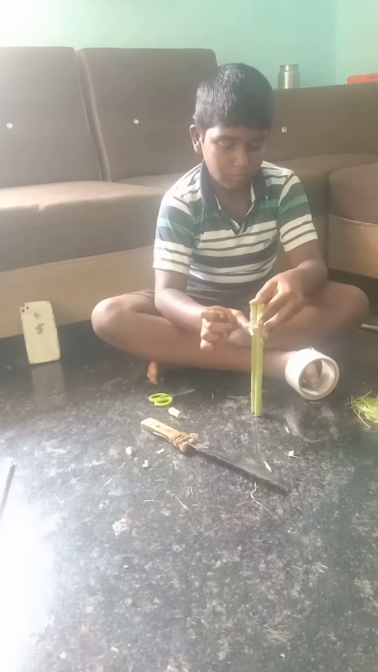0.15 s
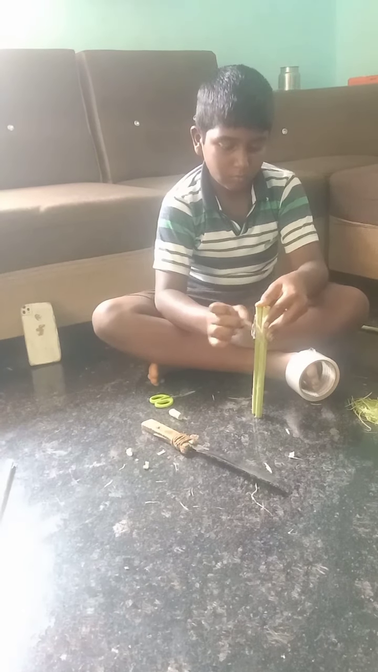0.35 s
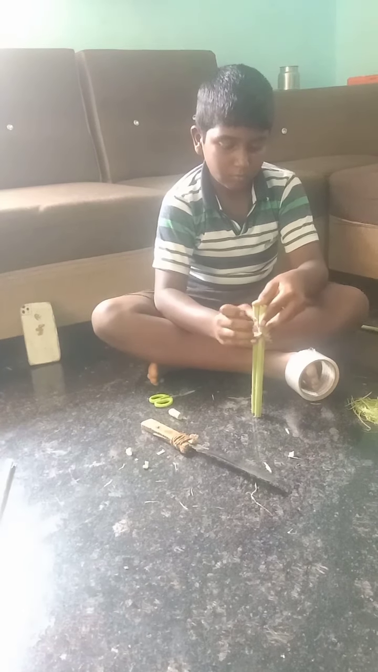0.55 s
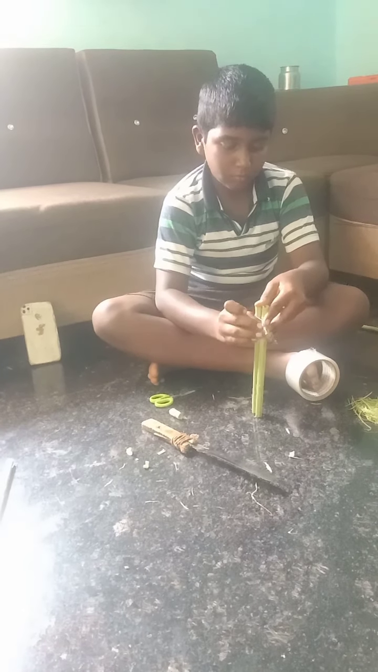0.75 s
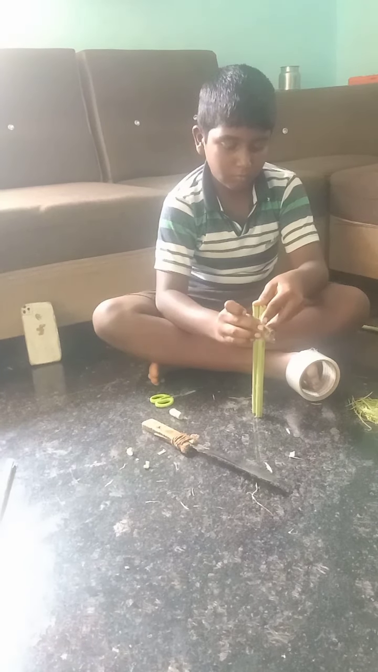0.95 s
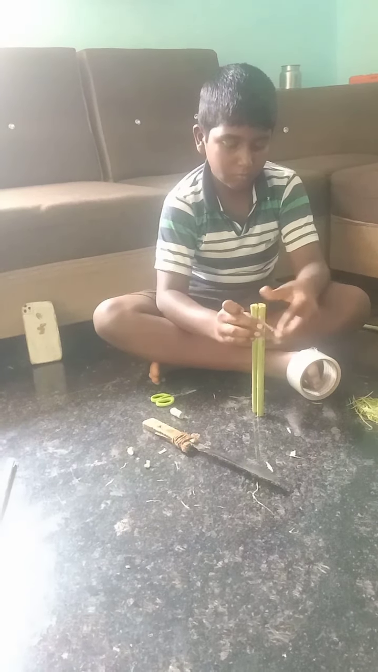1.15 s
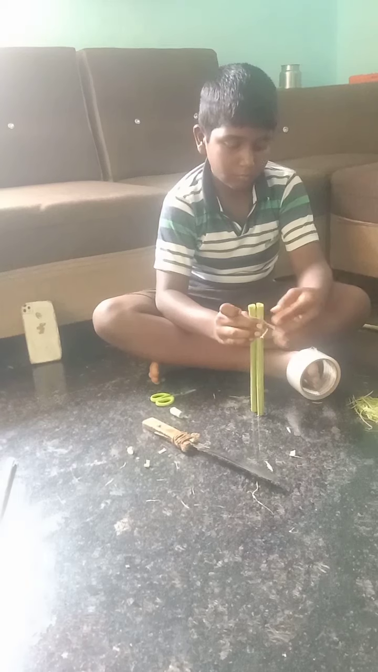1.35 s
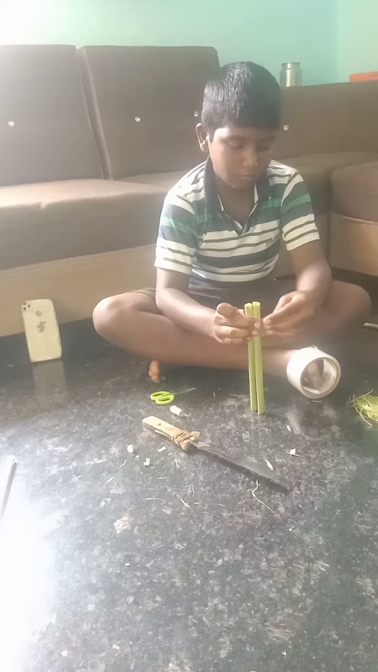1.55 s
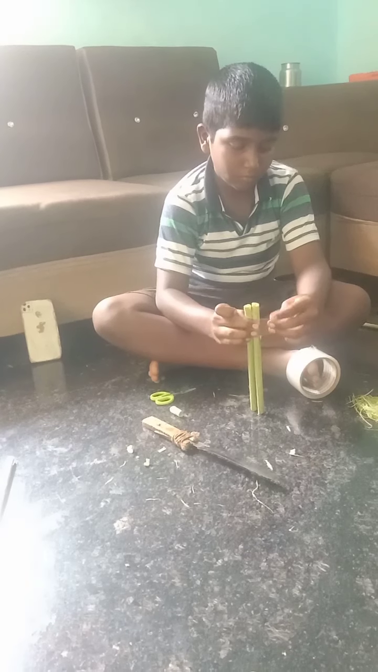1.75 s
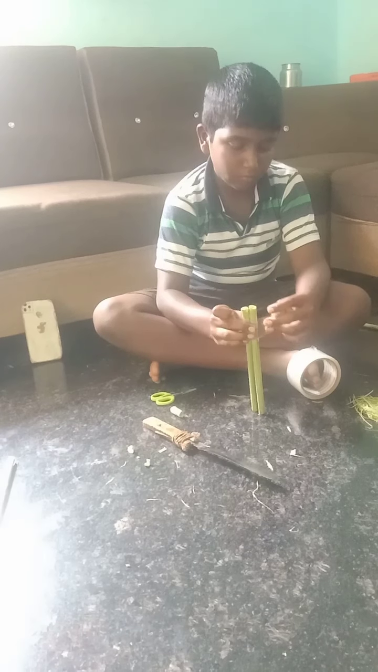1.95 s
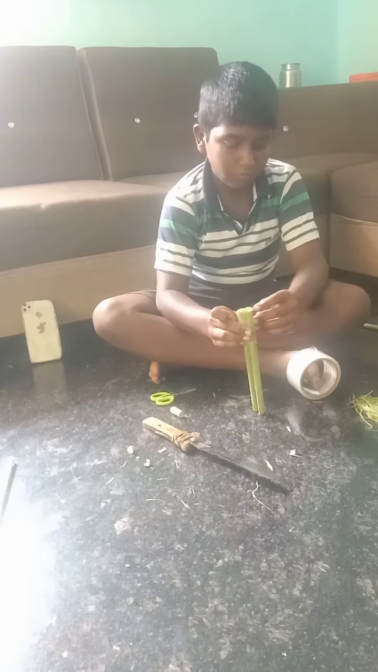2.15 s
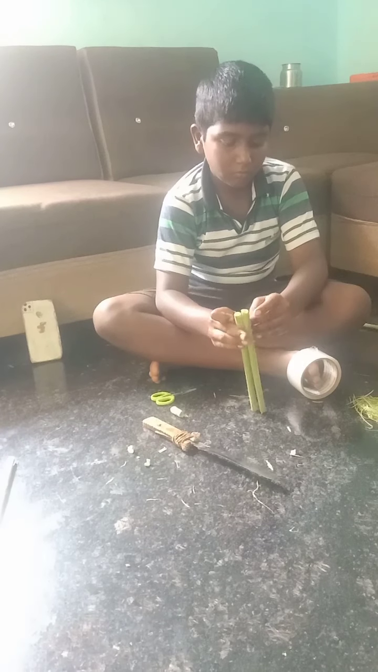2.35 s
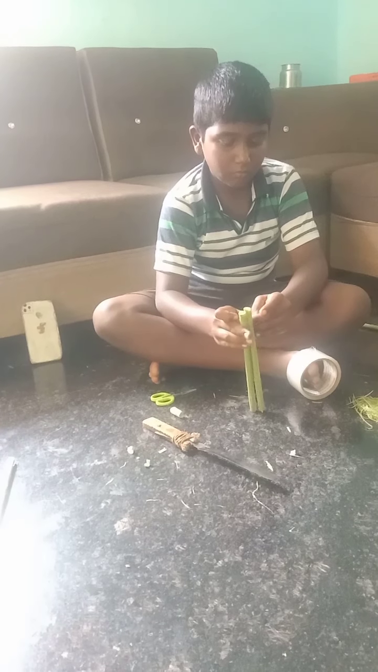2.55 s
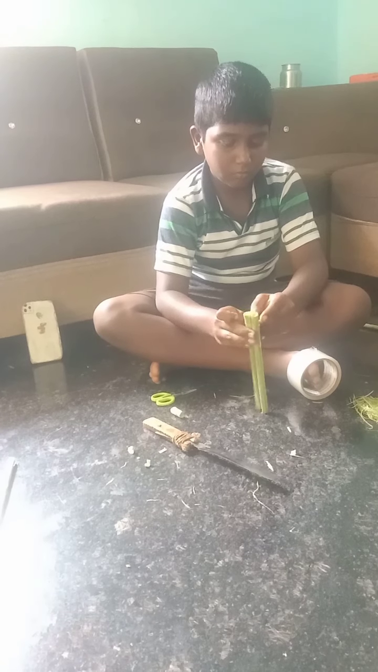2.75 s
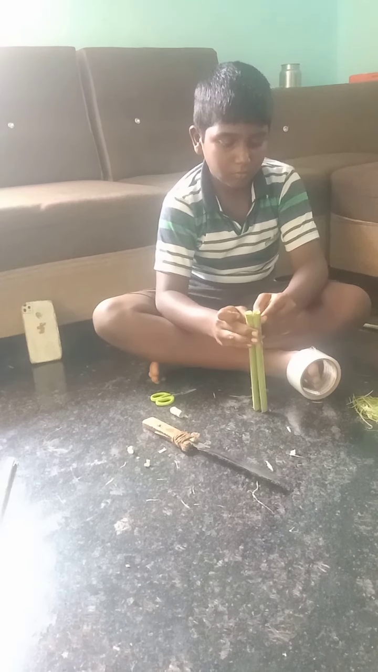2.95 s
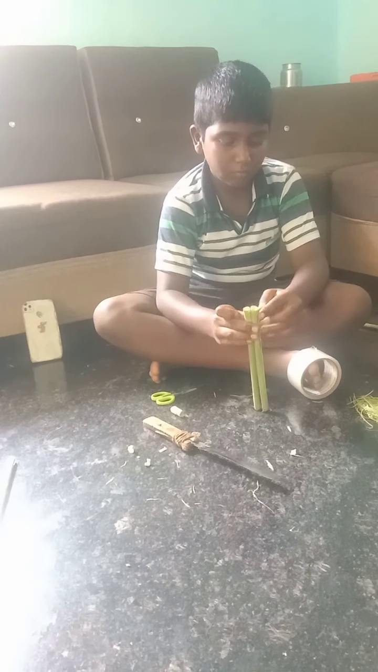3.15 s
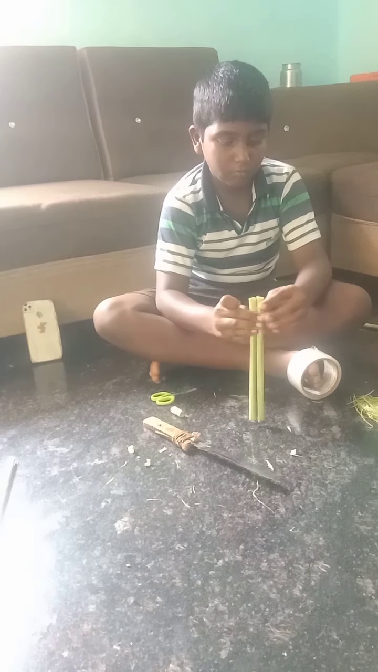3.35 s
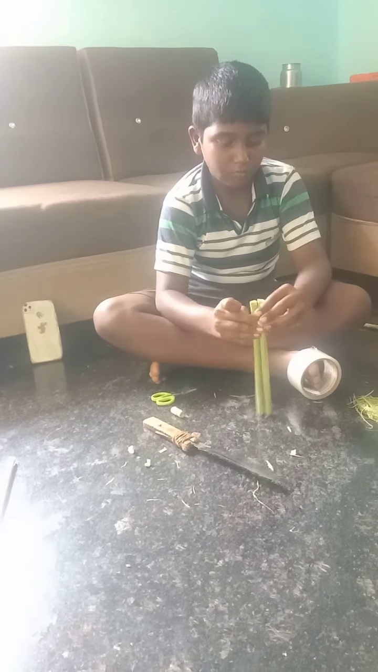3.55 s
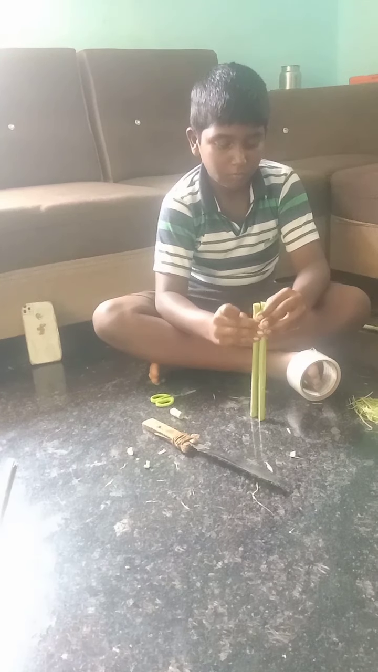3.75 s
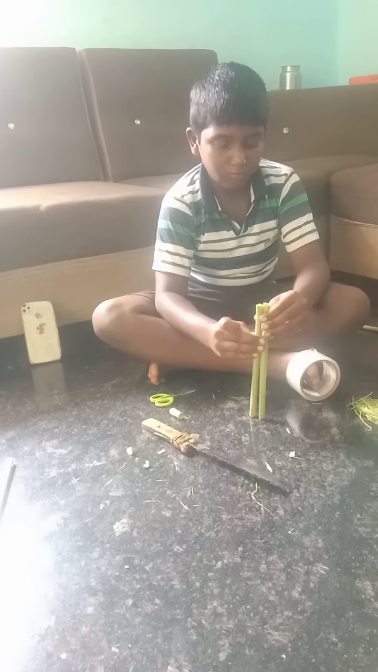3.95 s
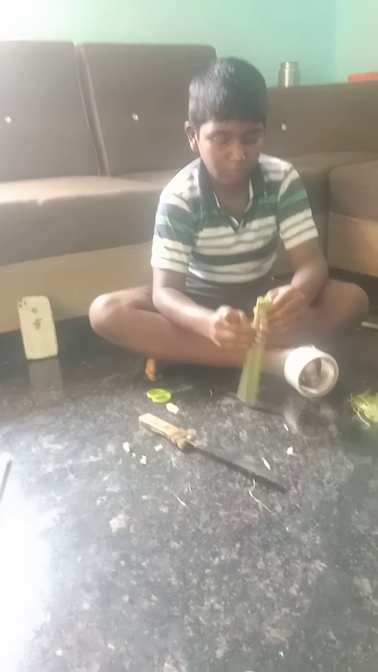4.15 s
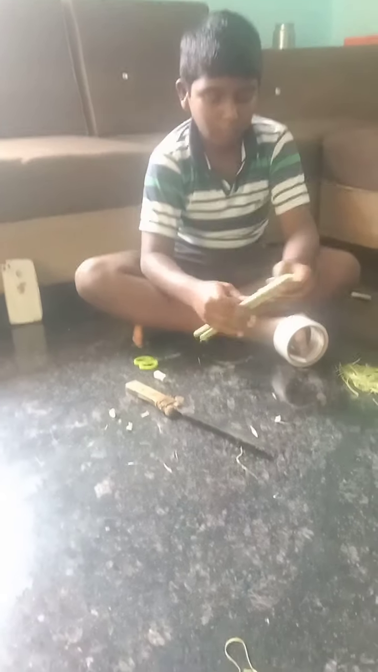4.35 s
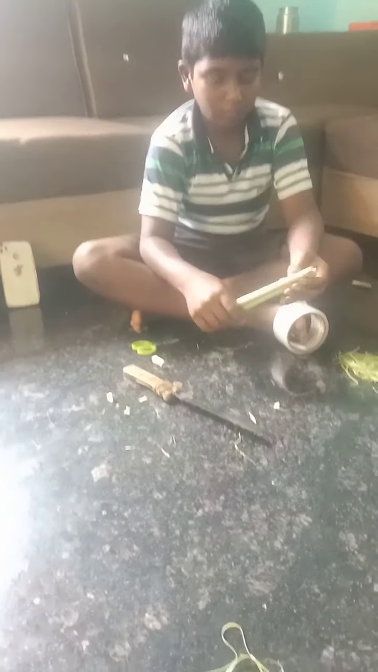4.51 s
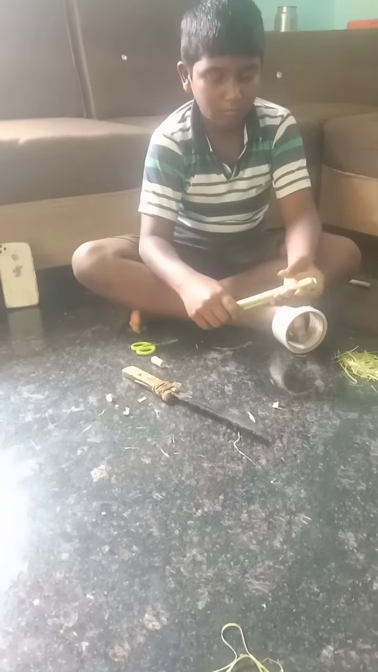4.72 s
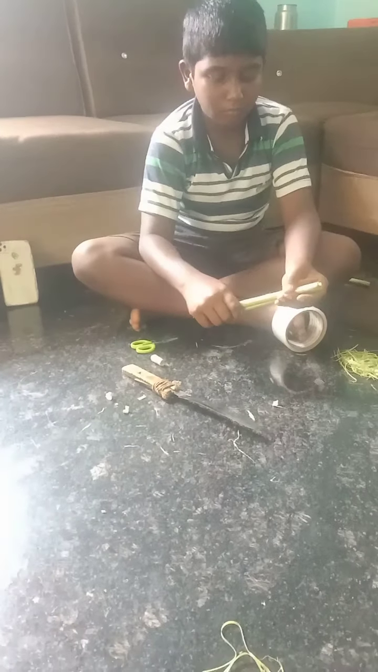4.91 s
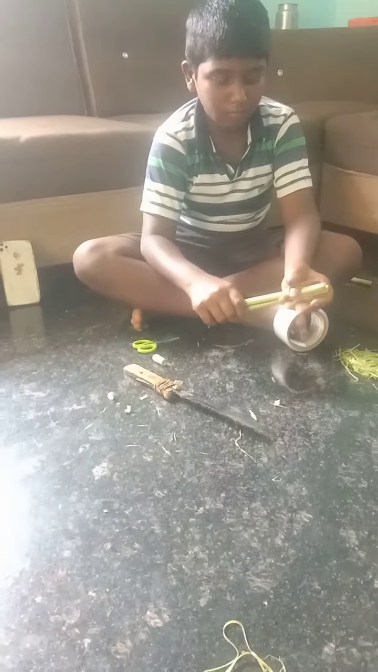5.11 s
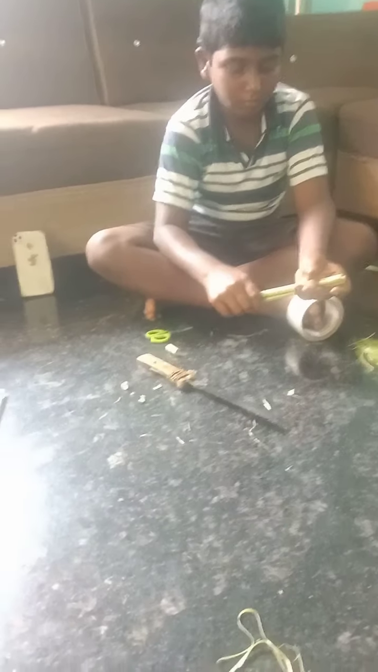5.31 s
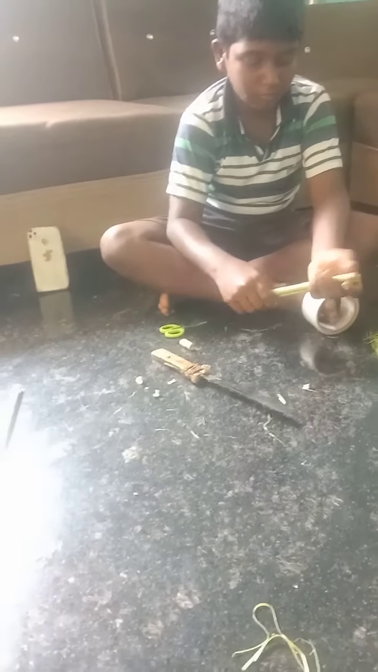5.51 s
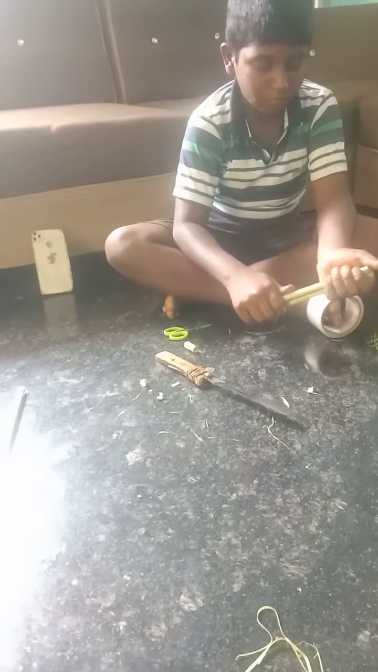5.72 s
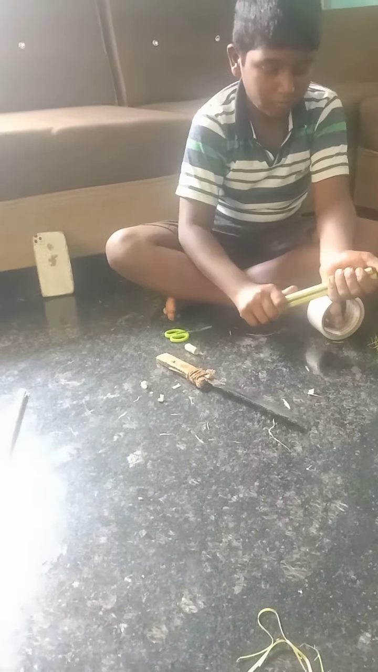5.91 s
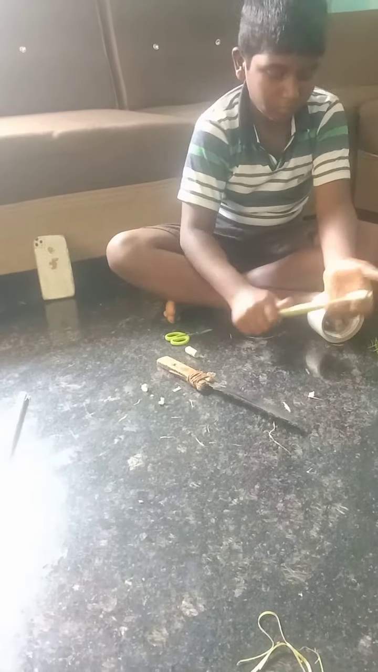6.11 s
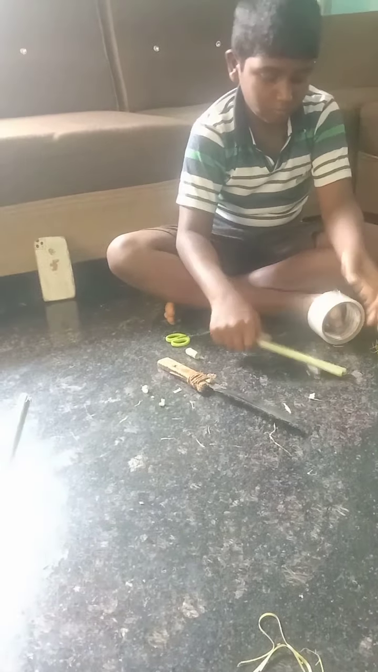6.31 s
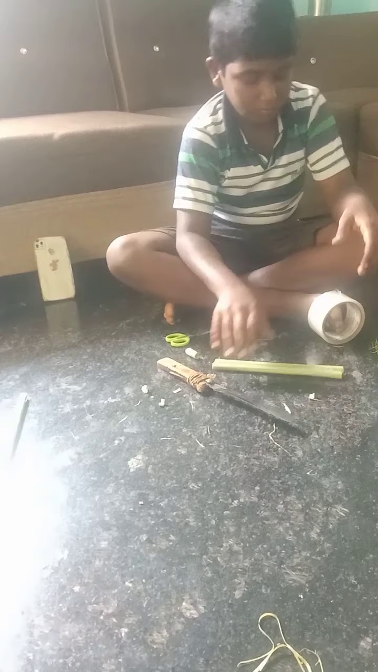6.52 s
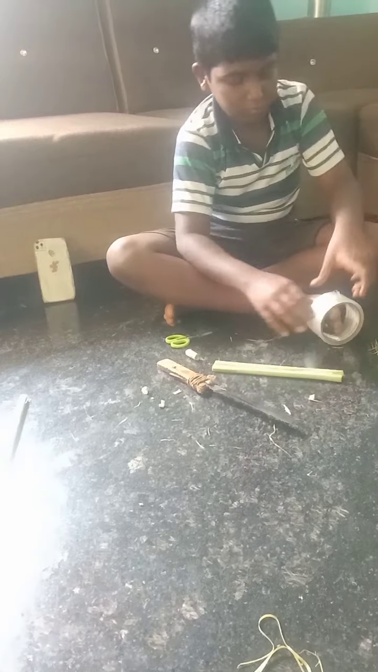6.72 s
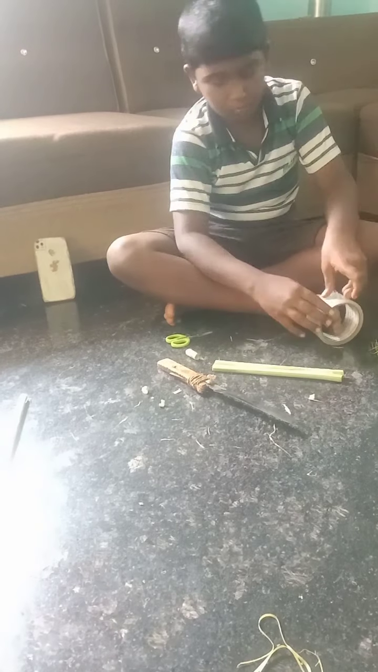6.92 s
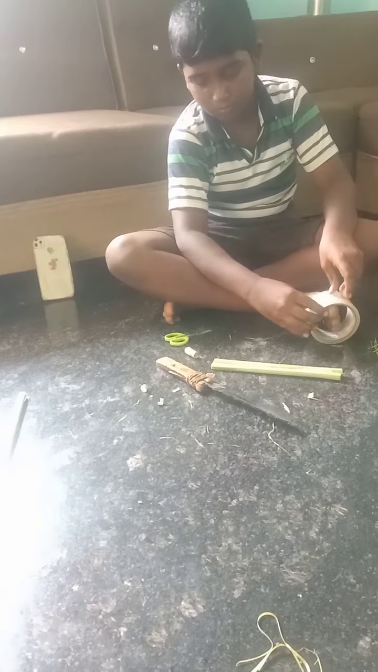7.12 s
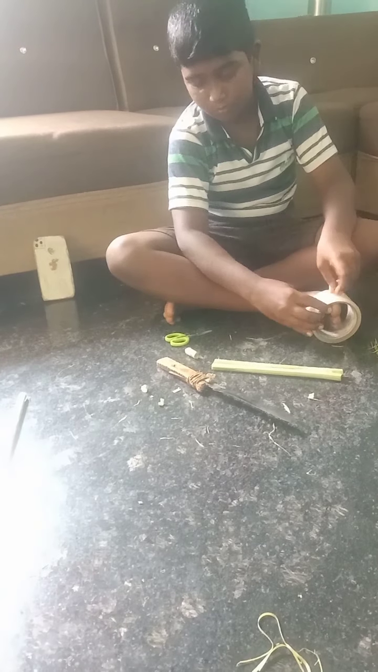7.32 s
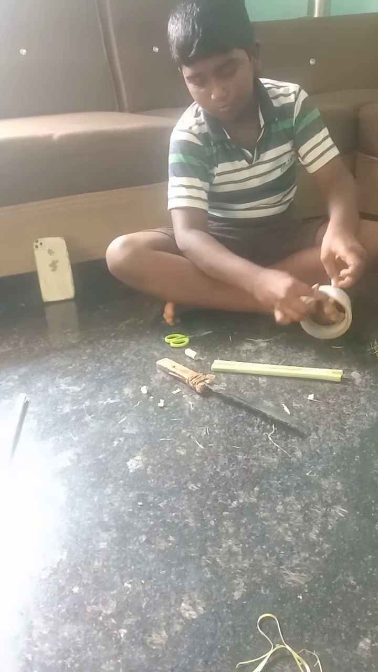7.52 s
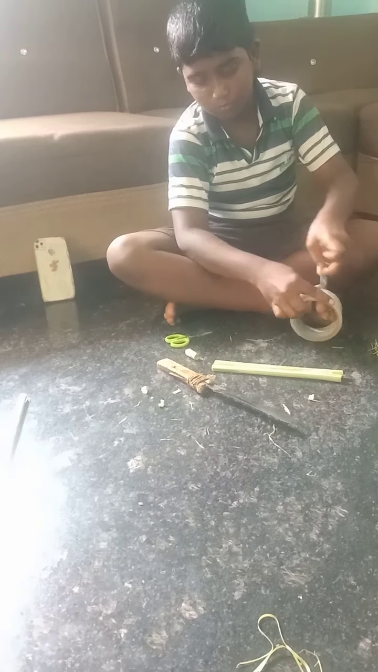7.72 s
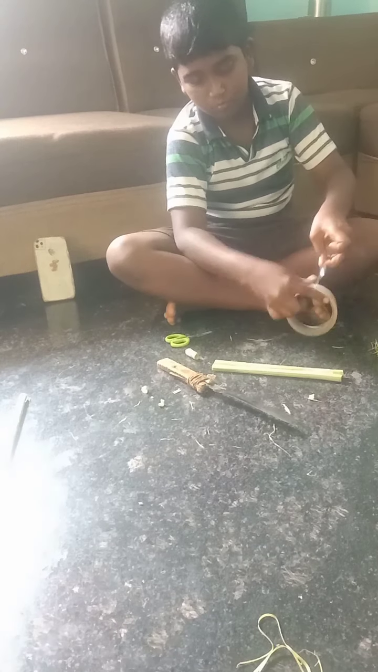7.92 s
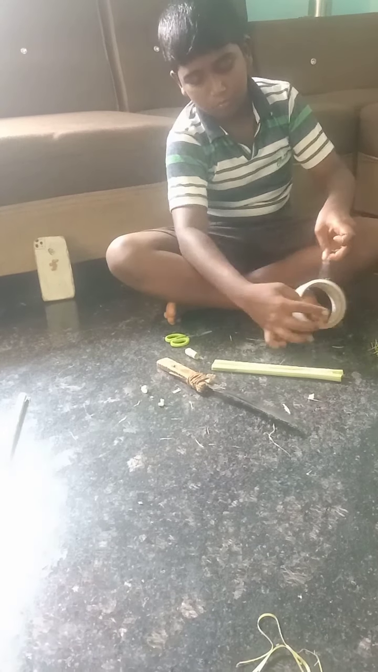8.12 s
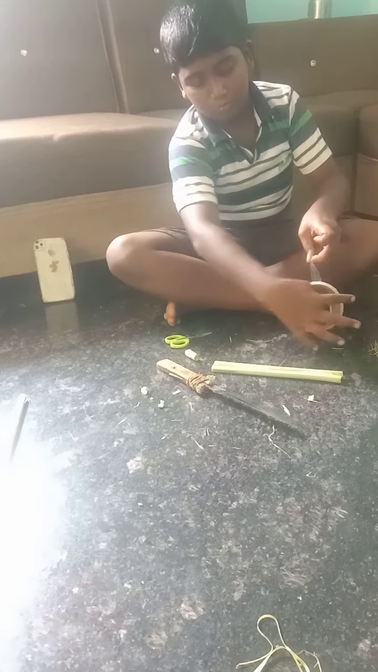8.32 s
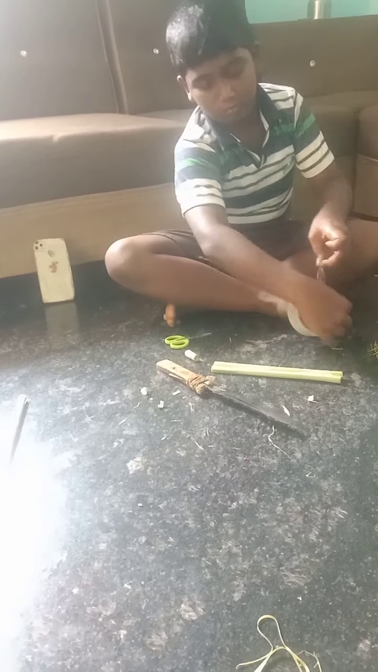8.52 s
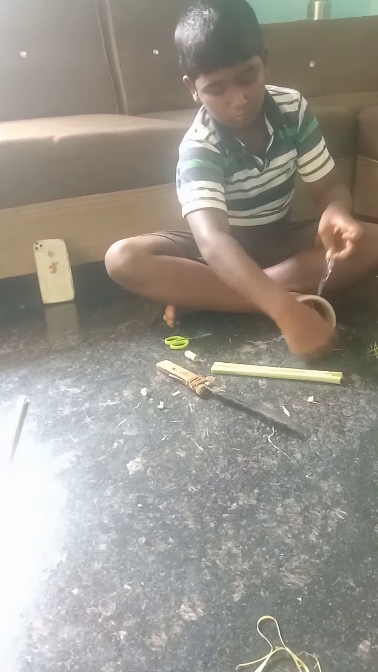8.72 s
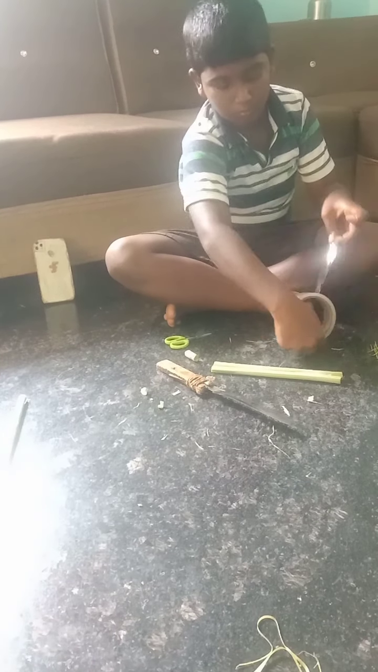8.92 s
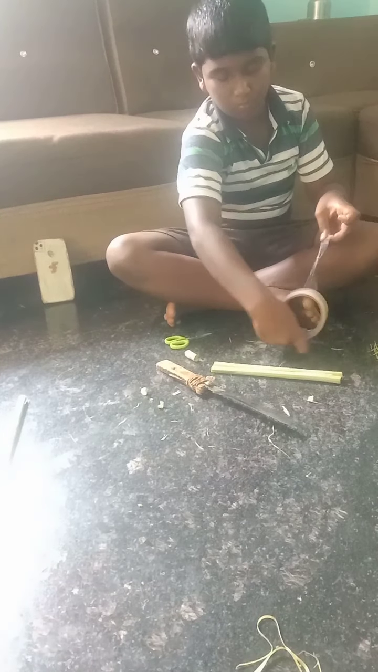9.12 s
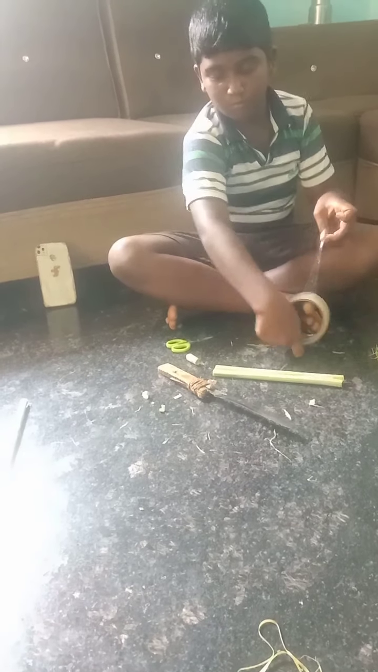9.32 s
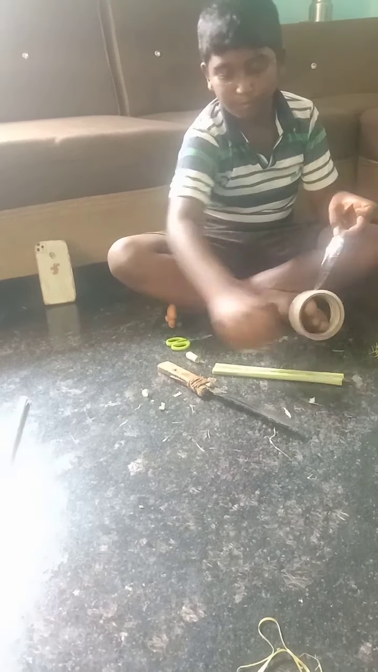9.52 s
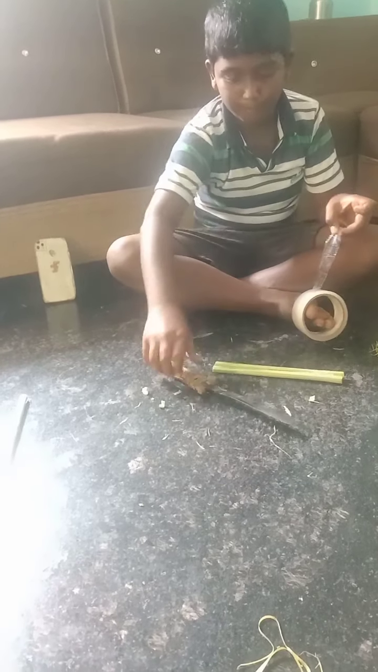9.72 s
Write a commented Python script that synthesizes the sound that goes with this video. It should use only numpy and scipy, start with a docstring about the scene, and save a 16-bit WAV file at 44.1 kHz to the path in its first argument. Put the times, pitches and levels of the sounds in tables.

```python
"""Outdoor wash runs throughout; over it a low rumble opens the scene, fades, and later returns fainter.
Someone on a stone floor presses tape round a bundle of stalks, in filtered noise snaps and fine ticks.
From 2.7 s a small bird squeals further off, built from unsteady harmonics and hiss; the bundle is set down.
From 7.35 s packing tape is ripped off its roll in short jerks, each a burst of tiny glue snaps.
The freed strip twangs lower as it lengthens, in two sagging sine modes, and the bare room rings."""
import sys
import numpy as np
from scipy import signal
from scipy.fft import rfft, irfft, next_fast_len
from scipy.io import wavfile
from scipy.ndimage import uniform_filter1d

SR = 44100
rng = np.random.default_rng(int(sys.argv[2]) if len(sys.argv) > 2 else 0)


def output_pcm(signal):
    """Save a mono or channel-first signal as 16-bit PCM at the path in sys.argv[1].

    Samples are clipped to [-1, 1] before scaling.
    """
    pcm = np.clip(np.atleast_2d(signal).T, -1, 1) * 32767
    wavfile.write(sys.argv[1], SR, np.round(pcm).astype(np.int16))


N = 430416
TIME = np.arange(N) / SR


def amp(db):
    """Turns dB into a linear gain."""
    return 10 ** (np.asarray(db) / 20)


def unit(x):
    """Scales a signal to an rms of 1."""
    return x / np.sqrt(np.mean(x ** 2) + 1e-20)


def read(points, hz):
    """Reads a spectrum table, joined on a log-frequency axis."""
    f, value = np.transpose(points)
    return np.interp(np.log(hz + 1), np.log(f + 1), value)


def add(mix, s, sound):
    """Lays a sound into the mix at s seconds, cut at the end."""
    part = mix[max(round(s * SR), 0):][:len(sound)]
    part += sound[:len(part)]


def colour(x, points, tilt_db=0):
    """Filters x by a spectrum and a tilt per octave above 1 kHz, keeping the power of white noise."""
    hz = np.fft.rfftfreq(len(x), 1 / SR)
    tilt = tilt_db * np.log2(np.maximum(hz, 1000) / 1000)
    gain = unit(amp(read(points, hz) + tilt))
    return irfft(rfft(x) * gain, len(x))


def wander(size, rate_hz):
    """Smooth random motion, cut from a stretch of rms 1, fading out of the spectrum around the given rate."""
    hz = np.fft.rfftfreq(next_fast_len(size + SR // 4), 1 / SR)
    noise = rng.standard_normal(2 * len(hz) - 2)
    return unit(irfft(rfft(noise) * np.exp(-(hz / rate_hz) ** 2)))[:size]


def fade(size, edge_s):
    """A gate with soft ends."""
    ramp = np.arange(size) / SR / edge_s
    return np.clip(np.minimum(ramp, ramp[::-1]), 0, 1)


def envelope(t, rise_s, hold_s, release_s):
    """Rises from t = 0, holds until hold_s, then dies away exponentially."""
    return np.clip(t / rise_s, 0, 1) * np.exp(-np.clip((t - hold_s) / release_s, 0, 20))


# Decay of the room's tail. Each row: frequency in Hz, time to fall 60 dB in seconds.
TAIL_T60 = [(100, 0.75), (500, 0.34), (1300, 0.57), (3500, 0.59), (7000, 0.43), (10000, 0.45), (15000, 0.3)]
# Echoes from nearby walls. Each row: delay in seconds, linear gain before the echo_db trim.
WALL_ECHOES = [(.0088, 0.24), (0.0176, 0.39), (0.0195, 0.19), (.0238, .33), (0.03, 0.05)]


def walls(x, wet_db, echo_db, build_s=0.0092):
    """A few wall echoes and a dense tail in which each pitch region dies at its own rate."""
    t = np.arange(SR) / SR
    taps = rng.choice([-1., 1.], SR) * (rng.random(SR) < .2)
    taps *= np.clip((t - .005) / build_s, 0, 1)
    hz, when, z = signal.stft(taps, SR, nperseg=256)
    decay = amp(-60 * when / read(TAIL_T60, hz)[:, None])
    tail = signal.istft(z * decay, SR, nperseg=256)[1]
    response = amp(wet_db) * tail / np.linalg.norm(tail)
    for delay, gain in WALL_ECHOES:
        response[round(delay * SR)] += gain * amp(echo_db)
    return signal.fftconvolve(x, response)[:N]


def room(source, wet_db, echo_db, count=3):
    """A crackling sheet sends a different wave each way: one to the microphone, the others to the walls."""
    direct = source()
    reflected = sum(walls(source(), wet_db, echo_db) for _ in range(count))
    return direct + reflected / np.sqrt(count)


# Tone of the outdoor wash. Each row: frequency in Hz, relative level in dB.
WASH_COLOUR = [(30, -31), (60, -9.5), (100, -10.5), (180, 1), (260, 0), (450, 1.5), (750, -4.5), (1000, -1),
               (1290, -5), (1480, -7.5), (2200, -15.5), (4000, -25), (7500, -34.5), (8300, -43),
               (16000, -44)]
# Slow fader on the wash. Each row: time in seconds, level in dB before the trim and flicker.
WASH_FADER = [(0, -57), (1.1, -54), (2.7, -54), (4.7, -57), (6.4, -55), (9.76, -55)]
# Steady drones in the distance. Each row: frequency in Hz, width in Hz, level in dB.
DISTANT_DRONES = [(183, 10.6, -70), (459.6, 25, -80), (1001, 39, -66), (1242, 22, -68.5), (1280, 22, -68)]


def outdoors(level_db=0.5, patchy_db=3, flicker_db=2.02):
    """A dull wash with drifting patches and faint drones, each a sine with random amplitude."""
    noise = colour(rng.standard_normal(N), WASH_COLOUR)
    z = signal.stft(noise, nperseg=1024, noverlap=768)[2]
    patches = uniform_filter1d(rng.standard_normal(z.shape), size=14, axis=1)  # smooth over time
    patches = unit(uniform_filter1d(patches, size=3, axis=0))  # smooth over frequency
    wash = unit(signal.istft(z * amp(patchy_db * patches), nperseg=1024, noverlap=768)[1][:N])
    fader_db = np.interp(TIME, *np.transpose(WASH_FADER))
    wash *= amp(fader_db + level_db + flicker_db * wander(N, 20))
    for hz, width, db in DISTANT_DRONES:
        wash += amp(db) * unit(wander(N, width) * np.sin(2 * np.pi * hz * TIME))
    return wash


# Tone of the rumble. Each row: frequency in Hz, relative level in dB.
RUMBLE_COLOUR = [(25, -19), (50, -28.5), (85, -5), (118, 6.5), (150, -6.5), (240, -15), (400, -35),
                 (900, -87)]
# Spells of distant rumble. Each row: start in seconds, length in seconds, level in dB before the throb.
RUMBLE_SPELLS = [(0, 0.52, -58), (0.696, 2.7, -55.5), (5.896, 3.6, -68)]
# Spells of a low hum. Each row: start in seconds, length in seconds.
HUM_SPELLS = [(2.9, 0.83), (6.45, 1.85)]
RUMBLE_RISE_S, RUMBLE_RELEASE_S, RUMBLE_REST_DB = 0.038, 0.13, -82.5
HUM_HZ, HUM_WIDTH_HZ, HUM_DB = 92, 11.4, -63.5


def rumble(throb_db=3, throb_hz=7.1):
    """A throbbing low rumble and a wavering hum come and go in the distance."""
    swell = amp(RUMBLE_REST_DB) + np.zeros(N)
    for s, length, db in RUMBLE_SPELLS:
        swell += amp(db) * envelope(TIME - s, RUMBLE_RISE_S, length, RUMBLE_RELEASE_S)
    noise = colour(rng.standard_normal(N), RUMBLE_COLOUR) * amp(throb_db * wander(N, throb_hz))
    hum = amp(HUM_DB) * unit(wander(N, HUM_WIDTH_HZ) * np.sin(2 * np.pi * HUM_HZ * TIME))
    hum_gate = sum(envelope(TIME - s, RUMBLE_RISE_S, length, RUMBLE_RELEASE_S) for s, length in HUM_SPELLS)
    return noise * swell + hum * hum_gate


# Bird calls. Each row: start in seconds, climb, hold and drop in seconds, top pitch in Hz,
# level in dB before the level_db trim, rasp from 0 to 1, strength of the other harmonics in dB.
SQUEALS = [ (2.712, 0.0015, .11, 0.11, 7080, -55.5, 0.6, -19), (2.92, 0, .1, 0.065, 4400, -59.5, 0.85, -4),
           (2.971, 0, 0.074, 0.0044, 3400, -57, 0.18, -13),
           (3.026, 0.0062, 0.21, 0.051, 5000, -58.5, 1, -12),
           (3.823, 0, .075, 0.021, 6650, -49.5, 0.62, 5.5), (3.903, 0, 0.072, 0.013, 4200, -45.5, 1, -9),
           (3.956, 0.0013, 0.019, 0.076, 4866, -37, 0.23, -6.5),
           (4.139, 0.0097, 0.032, 0.0093, 6620, -42.5, .45, 14),
           (4.176, 0.025, 0.048, .035, 7610, -39, 0.2, 6.5), (4.278, 0.0051, 0.036, 0, 6600, -44, 0.56, 6),
           (4.628, 0, 0.049, 0.0003, 7230, -42, 0.57, -8),
           (4.666, 0.00064, 0.041, 0, 6630, -40.5, 0.63, -20),
           (4.971, 0.021, 0.025, 0.005, 6830, -53, 0.21, -30), (5.19, 0, 0.027, 0, 6250, -58, 0.2, -14),
           (5.368, 0, 0.038, 0, 6640, -51, 0.1, -6), (5.638, 0.0038, 0.039, 0, 6900, -48.5, 0.2, -19),
           (5.893, 0.049, .018, 0.0011, 4900, -47, .25, -9),
           (6.011, 0.0021, 0.035, 0, 3100, -42.5, 0.2, -16),
           (6.044, 0.016, 0.012, 0.014, 3880, -42.5, 0.6, -5), (6.15, 0, 0.048, 0.0083, 4660, -63, .9, -5),
           (6.191, 0.016, .018, 0, 5710, -32, 0.28, -3.5),
           (6.273, 0.00066, 0.0053, 0.06, 5340, -36, 0.17, -11),
           (6.38, 0.037, 0.025, 0.012, 5420, -34.5, 0.26, -7),
           (6.583, 0.0026, 0.011, 0.041, 7330, -40, 0.4, 6),
           (6.681, 0.004, 0.023, 0.014, 7320, -47, .25, 9),
           (6.76, 0.034, 0.019, 0.014, 5170, -42, .04, -18),
           (7.19, 0.0018, 0.024, .06, 5800, -55.5, 0.47, -11), (7.254, 0, .08, 0.021, 4650, -53.5, 1, -4)]
# Tone of the other harmonics and the hiss. Each row: frequency in Hz, relative level in dB.
THROAT_COLOUR = [(2500, -13), (3600, -10), (5500, -6.5), (7500, -6.5), (8300, -37), (14000, -48)]
CLIMB_OCTAVES_PER_S, DROP_OCTAVES_PER_S = 7.5, 7.5
SOFTER_DB_PER_OCTAVE, RASP_PER_OCTAVE = 3, 0.44  # below its top pitch the voice is weaker and hoarser


def bird(jitter=0.089, jitter_hz=800, level_db=-8, throb_db=3, octave_db=-26, hiss_db=-13):
    """A shrill voice with one leading harmonic climbs, holds and drops; rasp shakes the pitch into a hiss."""
    out, voice_hz = np.zeros(N), 1800  # rough fundamental, used to choose the leading harmonic
    hiss = colour(rng.standard_normal(N), THROAT_COLOUR, tilt_db=-9.5)
    for s, climb, hold, drop, top_hz, db, rasp, buzz_db in SQUEALS:
        t = np.arange(0, climb + hold + drop, 1 / SR)
        below = CLIMB_OCTAVES_PER_S * np.maximum(climb - t, 0)  # octaves under the top pitch
        below += DROP_OCTAVES_PER_S * np.maximum(t - climb - hold, 0)
        hz = top_hz * 2 ** -below
        n, lead = len(t), max(round(hz.mean() / voice_hz), 1)
        shake = jitter * (rasp + RASP_PER_OCTAVE * below) * wander(n, jitter_hz)
        turns = np.cumsum(hz / lead * (1 + shake)) / SR
        voice = amp(hiss_db) * np.sqrt(abs(rasp)) * hiss[round(s * SR):][:n]
        for k in range(2, 2 * lead + 1):
            if k == lead:
                harmonic_db = 0
            elif k == 2 * lead:
                harmonic_db = octave_db
            else:
                harmonic_db = buzz_db + read(THROAT_COLOUR, hz * k / lead)
            voice += amp(harmonic_db) * np.sin(2 * np.pi * k * turns)
        effort = amp(db + level_db - SOFTER_DB_PER_OCTAVE * below) * fade(n, 0.0076)
        add(out, s, effort * unit(voice * amp(throb_db * wander(n, 150))))
    return out


# Soft bumps on the floor. Each row: start in seconds, peak of the envelope in dB, frequency in Hz.
FLOOR_BUMPS = [(6.366, -36.5, 70.5), (7.374, -47, 73), (7.931, -43.5, 86.5), (9.382, -48.5, 76.5)]


def bumps(rise_s=0.0094):
    """Hand and roll meet the floor with a dull, short push: a low sine under a quick swell."""
    out, t = np.zeros(N), np.arange(SR // 5) / SR
    for s, db, hz in FLOOR_BUMPS:
        push = t / rise_s * np.exp(1 - t / rise_s)
        add(out, s, amp(db) * push * np.sin(2 * np.pi * hz * t))
    return out


# Fingers rub the tape and the stalks. Each row: start in seconds, length in seconds, level in dB.
FINGER_RUSTLES = [(1.59, 0.055, -61), (2.037, 0.38, -71.5), (2.578, 0.054, -59.5), (3.1, 0.93, -82),
                  (5.377, 0.043, -64), (5.64, .08, -66), (5.925, 0.22, -72.5), (6.387, 0.051, -71)]
# Tone of ticks, rustles and crinkles. Each row: frequency in Hz, relative level in dB.
HANDLING_COLOUR = [(300, -18), (2000, -10), (3000, -1), (7000, 4), (8500, -1), (13000, 3.5), (16000, -2)]


def fingering(ticks_per_s=30, level_db=-81, spread_db=7.0, rustle_per_s=130):
    """Faint ticks while the fingers smooth the tape on, loudest near 4.5 s, with denser short rustles."""
    sizes = rng.choice([-1., 1.], N) * amp(spread_db * np.minimum(rng.exponential(1, N), 3))
    busy_db = np.interp(TIME, [.5, 1.8, 4.5, 4.9], [-10, -7.5, 9, -17])
    ticks = unit(sizes * (rng.random(N) < ticks_per_s / SR)) * amp(level_db + busy_db)
    grains = unit(sizes * (rng.random(N) < rustle_per_s / SR))
    for s, length, db in FINGER_RUSTLES:
        ticks += amp(db) * grains * ((TIME > s) & (TIME < s + length))
    return colour(ticks, HANDLING_COLOUR, tilt_db=-6.5)


# Crinkles of tape and stalks under the fingers.
# Each row: start in seconds, nominal peak in dB before crest_db is taken off, centre in Hz.
CRINKLE_SNAPS = [(0.4447, -46, 3930), (0.4902, -44, 7500), (0.7557, -43, 7300), (0.92, -42, 10200),
                 (0.9536, -47.5, 2540), (1.5466, -32.5, 5600), (1.6012, -31, 5900), (1.7779, -38, 7500),
                 (2.1298, -42.5, 5870), (2.1958, -36.5, 10700), (2.311, -30, 9800), (2.5829, -32.5, 4430),
                 (3.108, -39, 5210), (3.7283, -30.5, 6100), (3.7858, -34, 9000), (4.0, -45, 4960),
                 (4.4268, -29.5, 5570), (4.45, -35, 6700), (4.49, -30.5, 6030), (5.008, -47, 7300),
                 (5.261, -34.5, 3830), (5.3689, -39, 6260), (5.378, -31.5, 6150), (5.411, -40, 6900),
                 (5.6284, -23, 2920), (5.698, -35, 6880), (5.958, -36, 2930), (6.046, -33.5, 4800),
                 (6.2067, -21.5, 5400), (6.392, -26, 5000), (6.4214, -29, 5160)]
CRINKLE_DECAY_S = .0013


def crinkles(focus_db=11, crest_db=22):
    """Each crinkle is a very short noise snap, favouring its own pitch by focus_db per octave."""
    out, t = np.zeros(N), np.arange(1024) / SR
    hz, lead = np.fft.rfftfreq(len(t), 1 / SR), 64  # samples of room before the onset
    for s, db, centre_hz in CRINKLE_SNAPS:
        snap = np.roll(rng.standard_normal(len(t)) * np.exp(-t / CRINKLE_DECAY_S), lead)
        octaves_off = abs(np.log2((hz + 1) / centre_hz))
        snap = irfft(rfft(snap) * amp(read(HANDLING_COLOUR, hz) - focus_db * octaves_off))
        add(out, s - lead / SR, amp(db - crest_db) * unit(snap))
    return out


# Spells of slow peeling, first from the bundle, then round the jerks.
# Each row: start in seconds, length in seconds, level in dB.
PEEL_SPELLS = [(0.3, 0.066, -70.5), (1.363, .07, -69), (7.38, .1, -56), (7.557, 0.05, -52),
               (8.31, .12, -66.5), (8.528, 0.12, -54), (8.734, .075, -50), (9.23, 0.15, -58),
               (9.337, 0.054, -50)]
PEEL_RISE_S, PEEL_RELEASE_S = 0.033, 0.009


def peel(snaps_per_s=320, spread_db=5):
    """In slow peeling the glue lets go as a fine crackle of random clicks."""
    snaps = rng.choice([-1., 1.], N) * (rng.random(N) < snaps_per_s / SR)
    snaps *= amp(spread_db * np.minimum(rng.exponential(1, N), 4))
    crackle = unit(colour(snaps, [(100, -19.5), (350, -2.5), (800, -20.0), (1300, -8.5), (2800, -3.0),
                                  (3600, 5), (4800, -15.5), (9000, -16.5), (16000, -18.5)]))  # (Hz, dB)
    swell = sum(amp(db) * envelope(TIME - s, PEEL_RISE_S, length, PEEL_RELEASE_S)
                for s, length, db in PEEL_SPELLS)
    return crackle * swell


# The harder jerks pluck the taut strip. Each row: start in seconds, decay in seconds,
# low mode's starting pitch in Hz and level in dB, high mode's starting pitch in Hz and level in dB.
STRIP_TWANGS = [(7.55, 0.035, 447, -71, 1323, -32), (7.575, .02, 420, -68, 1082, -40),
                (7.921, 0.076, 447, -54.5, 1293, -49.5), (8.527, 0.059, 549, -39.5, 1580, -64),
                (8.606, 0.019, 443, -37, 1475, -38), (8.752, 0.027, 334.7, -42.5, 1286, -38),
                (8.795, 0.022, 306, -50, 1053, -43), (9.066, 0.0089, 256, -53, 1353, -37.5)]
TWANG_RISE_S, TWANG_HOLD_S, TWANG_LENGTH_S = 0.001, 0.0069, .15
SAG_OCTAVES_PER_S = 2.4  # the pitch sags as more tape comes free


def strip(wobble_hz=55, flutter_hz=170, throb_db=4.0):
    """Two modes of the stretched strip, unsteady as its tension jumps; the low one wobbles less."""
    out, t = np.zeros(N), np.arange(0, TWANG_LENGTH_S, 1 / SR)
    sag = 2 ** (-SAG_OCTAVES_PER_S * t)
    for s, decay_s, low_hz, low_db, high_hz, high_db in STRIP_TWANGS:
        for hz, db in ((low_hz, low_db), (high_hz, high_db)):
            wobble = wobble_hz * np.sqrt(hz / 1000) * wander(len(t), flutter_hz)
            turns = np.cumsum(hz * sag + wobble) / SR
            mode = unit(np.sin(2 * np.pi * turns) * amp(throb_db * wander(len(t), flutter_hz)))
            add(out, s, amp(db) * mode * envelope(t, TWANG_RISE_S, TWANG_HOLD_S, decay_s))
    return out


# Jerks of the tape. Each row: start in seconds, length in seconds, level in dB,
# brightness in dB per octave above 1 kHz, ring of the film in Hz.
TAPE_JERKS = [(7.3543, 0.0057, -39, 3, 6760), (7.403, 0.012, -40, 2.5, 4220),
              (7.506, 0.0046, -34.5, -0.5, 3370), (7.551, 0.0089, -31.5, 1, 4730),
              (7.561, 0.0038, -28.5, 1, 4320), (7.919, 0.0093, -36, -1.5, 3510),
              (8.518, 0.007, -34.5, 0.5, 3895), (8.537, 0.0037, -39, -2, 4100),
              (8.552, 0.0088, -35.5, -3, 2950), (8.604, 0.0055, -29.5, 1, 4500),
              (8.6115, 0.0066, -29.5, 0, 2100), (8.735, 0.0067, -31, 1, 4200),
              (8.755, 0.0057, -29, 2, 4060), (8.784, 0.0052, -32.5, 2.5, 3800),
              (9.0643, 0.0064, -24.5, 0.5, 6280), (9.34, 0.0098, -40.5, -2.5, 3430)]
# Tone of the ripping film. Each row: frequency in Hz, relative level in dB.
FILM_COLOUR = [(100, -37), (250, -17), (470, -16.5), (800, -3.5), (1300, -3.5), (2000, -3), (2600, -1),
               (4200, -2.5), (5600, 0), (6300, -5.5), (7300, 0), (8300, -8.5), (13000, -7), (16000, -5)]


def rips(snaps_per_s=6000, sag_db=6, ring_db=6, ring_octaves=0.13):
    """The peel front races across the tape in a few ms, snapping threads of glue; the film rings with them."""
    out, pad = np.zeros(N), 256  # samples of silence either side of a burst
    hz = np.geomspace(100, SR / 2, 200)
    for s, length, db, bright_db, ring_hz in TAPE_JERKS:
        n = max(int(length * SR), 32)
        snaps = rng.standard_normal(n) * (rng.random(n) < snaps_per_s / SR)
        sag = amp(-sag_db * np.arange(n) / n)  # the burst weakens towards its end
        burst = np.pad(unit(snaps * fade(n, 0.00086) * sag), pad)
        ring = ring_db * np.exp(-(np.log2(hz / ring_hz) / ring_octaves) ** 2)
        film_db = read(FILM_COLOUR, hz) + ring
        add(out, s - pad / SR, amp(db) * colour(burst, np.c_[hz, film_db], bright_db))
    return out


def scene():
    """Mixes tape, hands and bird in the room with the sounds outdoors."""
    crackle, twang, calls = peel(), strip(), bird()
    tape = room(rips, wet_db=2.0, echo_db=-3.5)
    tape += crackle + walls(crackle, wet_db=-1.5, echo_db=-23)
    tape += twang + walls(twang, wet_db=-0.5, echo_db=-1)
    hands = room(crinkles, wet_db=-6.0, echo_db=-5.5, count=2)
    hands += room(fingering, wet_db=1.5, echo_db=-6, count=1) + bumps()
    squeals = calls + walls(calls, wet_db=-1.0, echo_db=-7.5)
    return (tape + hands + squeals + outdoors() + rumble())[None]


# Response of the microphone. Each row: frequency in Hz, gain in dB.
MIC_RESPONSE = [(20, -2.5), (13500, 1.5), (14300, -5), (15100, 12), (15600, 11), (16000, -33)]
EDGE_HZ = 16200


def record(dry):
    """The microphone port rings in the top treble; then a low-pass sets the band limit."""
    hz = np.fft.rfftfreq(N, 1 / SR)
    heard = irfft(rfft(dry) * amp(read(MIC_RESPONSE, hz)), N)
    low_pass = signal.firwin(511, EDGE_HZ, window=("kaiser", 9), fs=SR)
    return signal.oaconvolve(heard, low_pass[None], "same")


dry = scene()
out = record(dry)
output_pcm(out)
```